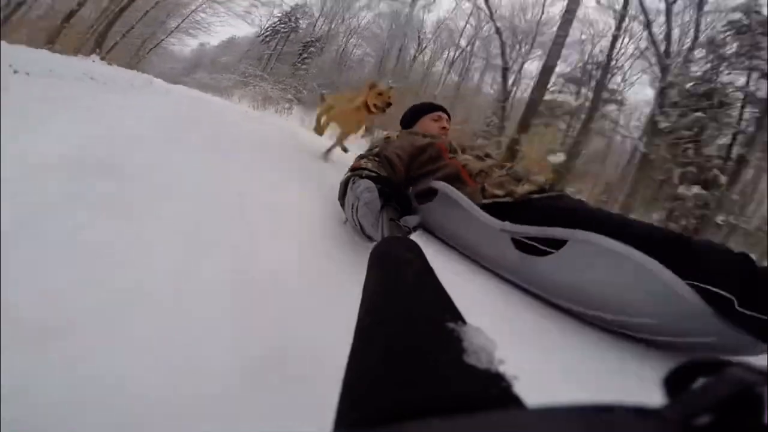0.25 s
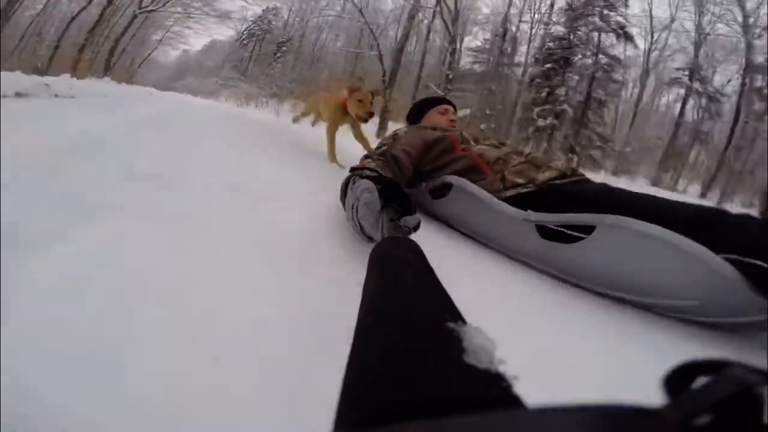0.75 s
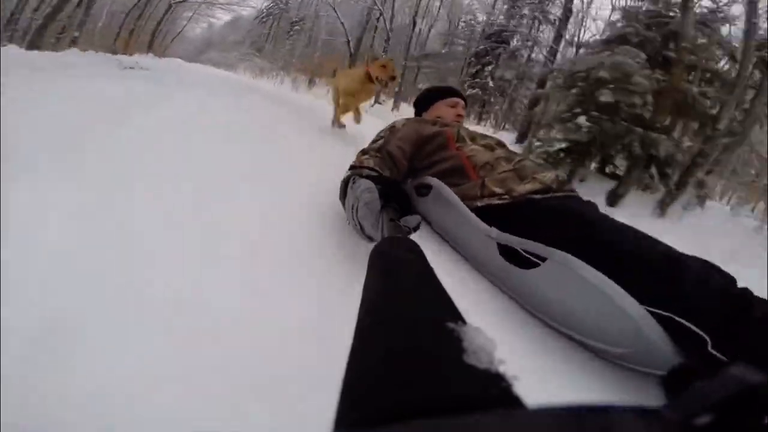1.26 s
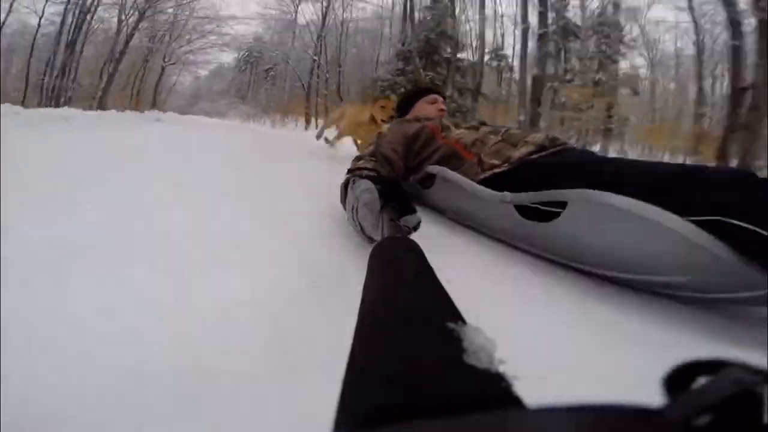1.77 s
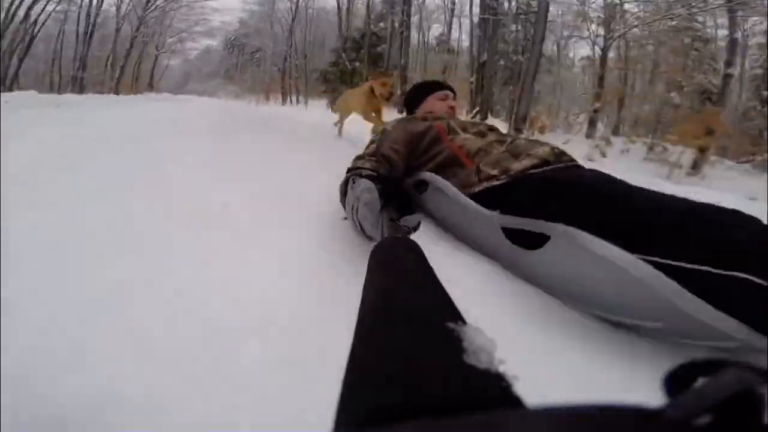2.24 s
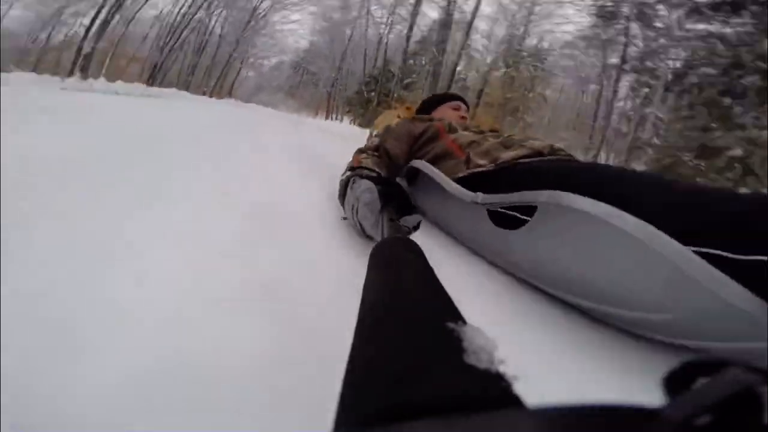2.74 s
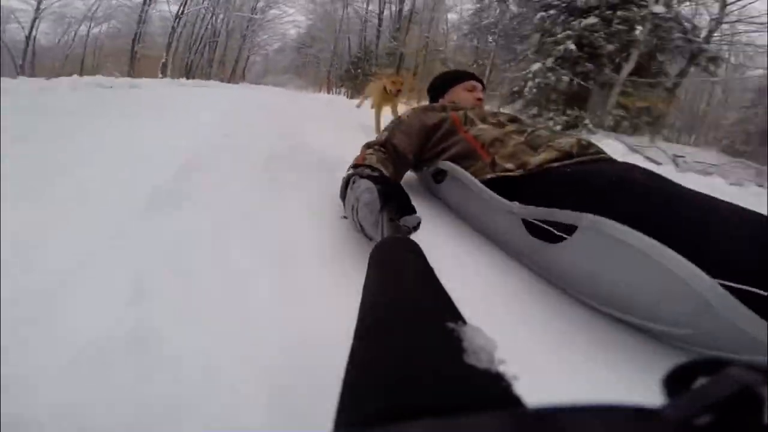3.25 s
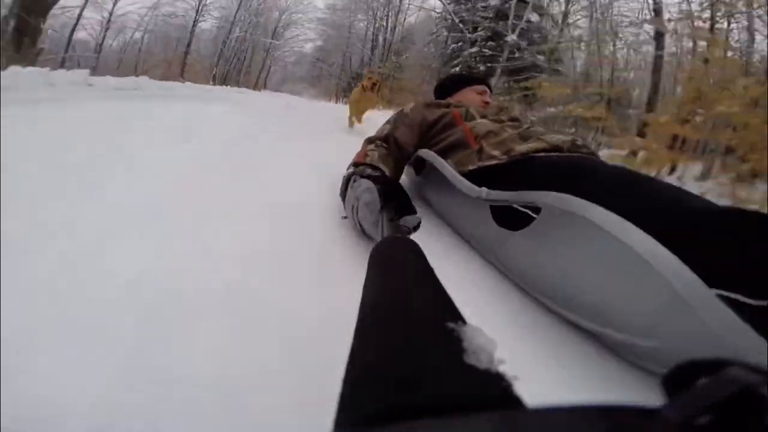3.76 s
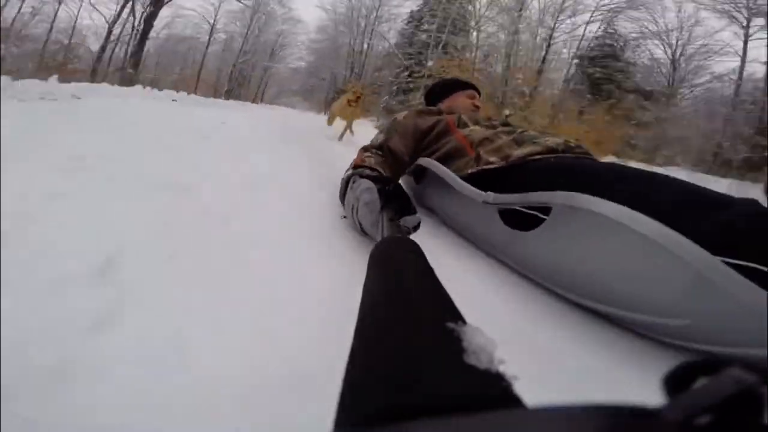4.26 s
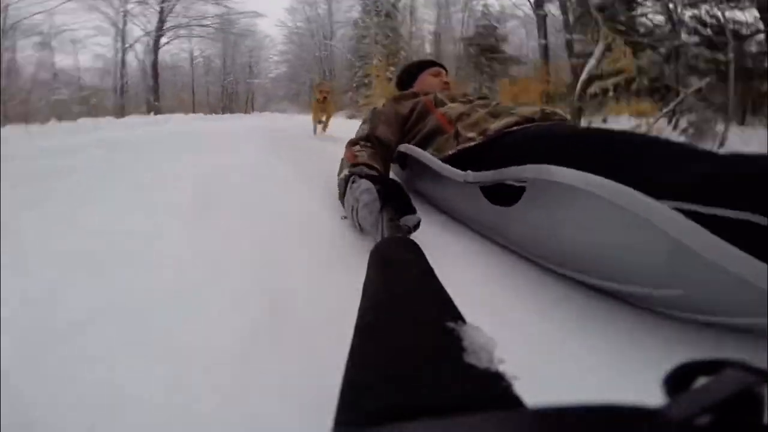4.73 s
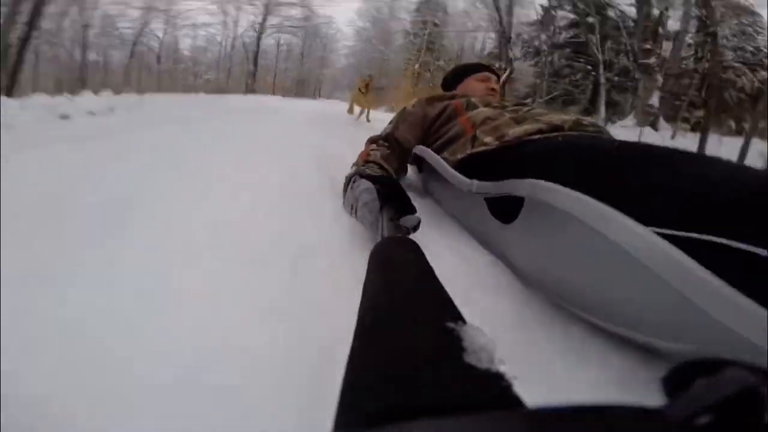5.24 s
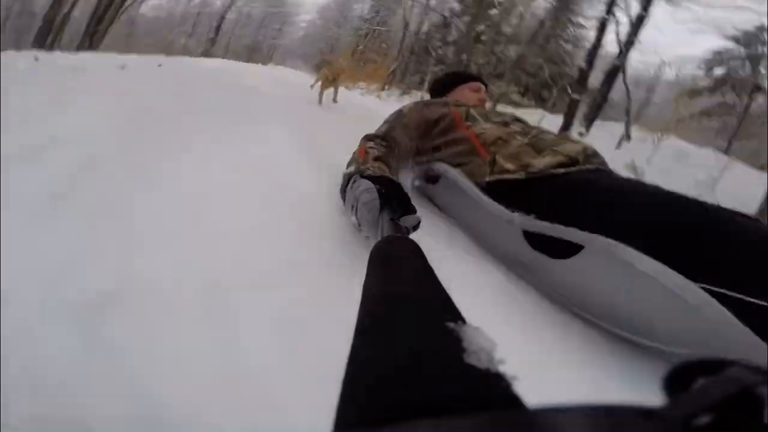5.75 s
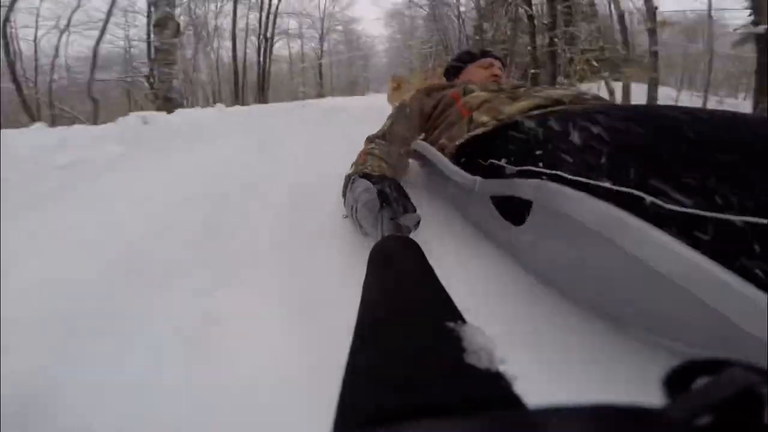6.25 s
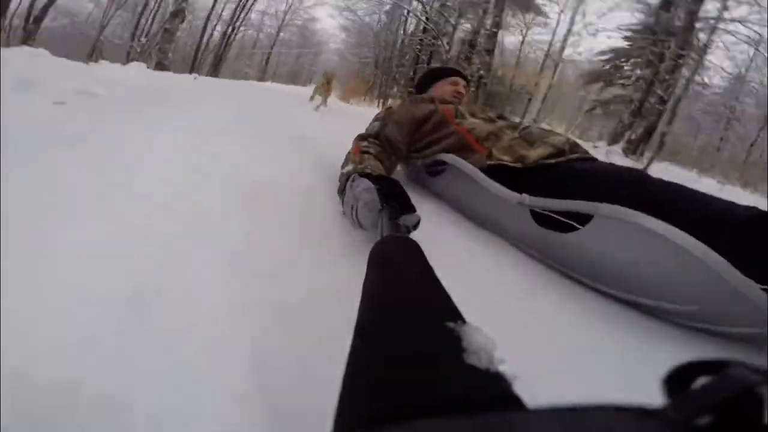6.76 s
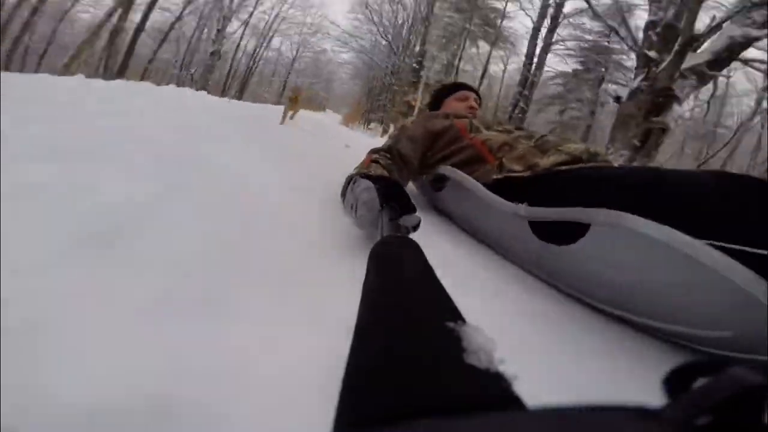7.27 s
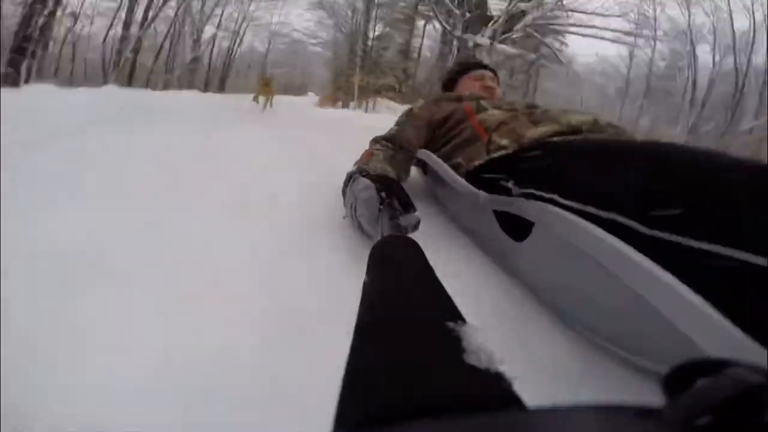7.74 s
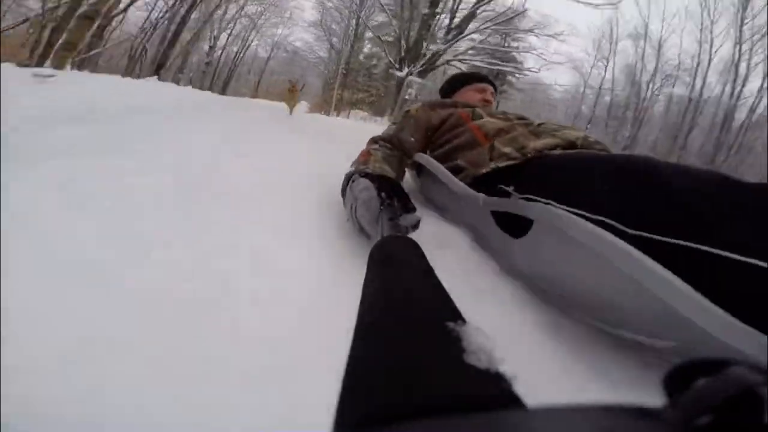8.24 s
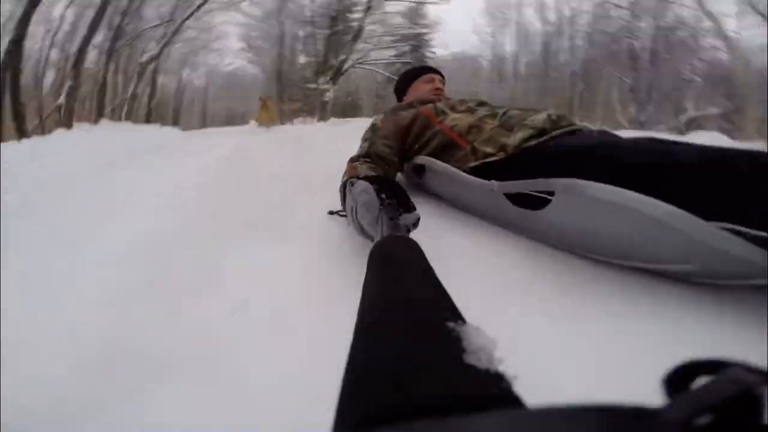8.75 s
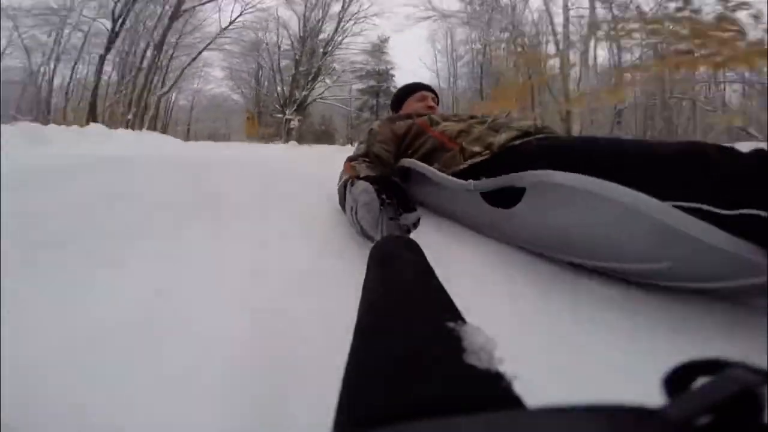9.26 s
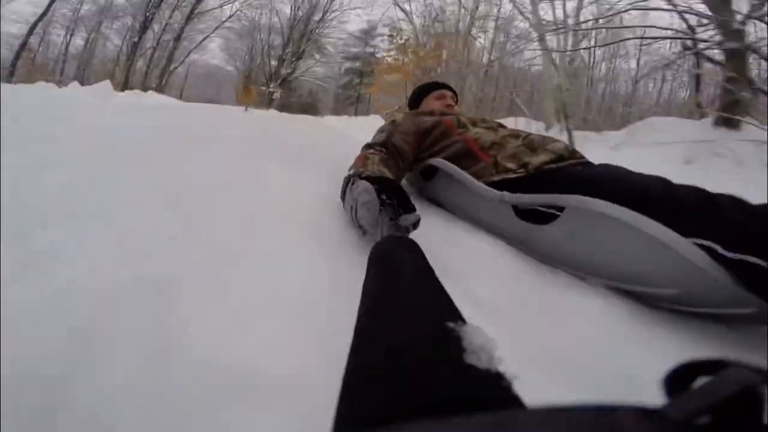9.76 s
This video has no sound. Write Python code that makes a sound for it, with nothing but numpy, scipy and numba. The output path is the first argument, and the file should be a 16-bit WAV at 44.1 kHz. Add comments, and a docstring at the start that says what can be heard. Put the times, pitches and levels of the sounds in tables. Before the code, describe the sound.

A plastic sled scrapes and hisses over packed snow, with low thuds and sharp ticks of ice hitting the microphone's case.

```python
"""First comes the gritty scrape of a plastic sled running down a packed snow road, with hissing spray and a
drumming hull. The microphone rides inside a hard camera case, on a pole that skims the snow. Right at the
microphone, loose ticks ring the case, a few loud ones and many faint ones; each touch on the snow shakes the
pole's bending modes into a low thud. The camera's limiter ducks for a moment after the loudest ticks."""
import sys
import numpy as np
from scipy.fft import rfft, irfft, next_fast_len
from scipy.io import wavfile
from scipy.ndimage import uniform_filter1d, map_coordinates
from numba import njit

SR = 44100
rng = np.random.default_rng(int(sys.argv[2]) if len(sys.argv) > 2 else 0)


def bounce(signal):
    """Save signal as a 16-bit WAV file at the path given by the first command-line argument."""
    frames = np.transpose(np.atleast_2d(signal))
    limited = np.clip(frames, -1, 1)
    pcm = np.round(limited * 32767).astype(np.int16)
    wavfile.write(sys.argv[1], SR, pcm)


N = 441000


def amp(db):
    """Gain of a level in dB."""
    return 10 ** (np.asarray(db) / 20)

def unit(x):
    """x at rms 1."""
    return x / np.sqrt(np.mean(x ** 2) + 1e-20)

def evened(x, seconds, depth):
    """x at rms 1 with its random swells partly evened out."""
    power = np.abs(uniform_filter1d(x ** 2, size=int(seconds * SR))) + 1e-12
    return unit(x / power ** (depth / 2))

def curves(rows):
    """One value per sample for each column after the time."""
    times, *columns = np.transpose(rows)
    return [np.interp(np.arange(N) / SR, times, column) for column in columns]

def wobble(rate):
    """A smooth random curve, rate knots a second."""
    return map_coordinates(rng.standard_normal(int(N * rate / SR) + 4), [np.arange(N) * rate / SR])

def filtered(x, response):
    """x through a complex response of frequency."""
    n = x.shape[-1]
    padded = next_fast_len(n + 8192)
    return irfft(rfft(x, padded) * response(np.fft.rfftfreq(padded, 1 / SR)), padded)[..., :n]

def modes(table):
    """Causal response of resonances with alternating signs."""
    return lambda f: sum((-1) ** k * amp(db) * 1j * f * width / (hz * hz - f * f + 1j * f * width)
                         for k, (hz, width, db) in enumerate(table))

def lowpass(corner_hz, power):
    """Causal low-pass response, 6 dB an octave for each unit of power."""
    return lambda f: 1 / (1 + 1j * f / corner_hz) ** power

def highpass(corner_hz, power):
    """The matching high-pass response."""
    return lambda f: (1 - lowpass(corner_hz, 1)(f)) ** power

def grit(per_second, spread_db, share):
    """Noise of rms 1 with a share of single snow grains of scattered size."""
    hit = rng.random(N) < per_second / SR
    size = amp(spread_db * np.minimum(rng.exponential(size=N), 3))
    grains = hit * size * rng.choice([-1, 1], N)
    return np.sqrt(share) * unit(grains) + np.sqrt(1 - share) * rng.standard_normal(N)


# Resonances around the microphone: f/Hz, width/Hz, level/dB
CASE_AIR = [(2340, 1200, -4)]
CASE_MODES = [(1403, 504, -2), (2279, 282, 4)]
LID_MODES = [(2570, 220, 4), (3478, 330, -4)]
def scrape(case_db, lid_db, patch, jolt_db):
    """Snow crushed under the hull rings the case and its lid, which the grip damps more or less."""
    pressure = amp(patch + 1.68 * wobble(45) + 0.42 * jolt_db)
    crunch = pressure * grit(per_second=500, spread_db=6.3, share=0.29)
    inside = filtered(crunch, lambda f: 0.88 + modes(CASE_AIR)(f))
    case = amp(case_db + 4.5) * unit(filtered(inside, modes(CASE_MODES)))
    lid = amp(lid_db + 3) * unit(filtered(inside, modes(LID_MODES)))
    return case + lid

# The case's thin walls, right beside the microphone: f/Hz, width/Hz, level/dB
WALL_MODES = [(4150, 600, -9), (4850, 650, 0), (5880, 700, -5), (6900, 800, -9.5), (8550, 700, -16),
              (9680, 1100, -12.5), (11800, 1300, -17.5), (13000, 1000, -23), (14600, 1500, -28)]
def spray(level_db, patch, jolt_db):
    """Snow spray hisses in the case walls; each rings through two stages and flickers on its own."""
    grains = grit(per_second=450, spread_db=8.5, share=0.14)
    wall = lambda hz, width: filtered(grains, lambda f: np.abs(modes([(hz, width, 0)])(f)) ** 2)
    walls = sum(amp(db + 2.4 * wobble(12)) * wall(hz, width) for hz, width, db in WALL_MODES)
    surge = amp(0.63 * patch + 0.9 * wobble(60) + 0.29 * jolt_db)
    return amp(level_db) * unit(surge * walls)

# The plastic hull, down on the road: f/Hz, width/Hz, level/dB
HULL_MODES = [(360, 300, 1.5), (577.5, 88, 7), (693, 82, 6.5), (1080, 3600, -40)]
def hull_drum(scrape_db, upper_db, jolt_db):
    """The hull drums along with the scrape and with the pole's upper bending."""
    bumps = amp(0.81 * wobble(25) + 0.28 * jolt_db) * rng.standard_normal(N)
    drive = np.hypot(amp(scrape_db - 8.5), amp(upper_db - 17.5))
    ringing = filtered(bumps, modes(HULL_MODES))
    return drive * unit(filtered(ringing, lowpass(1050, 2.22)))

# The run, heard from inside the case: t/s, scrape level/dB, spray level/dB, scrape level in the lid/dB
SLED_RUN = [(0.0, -35.5, -41, -32.5), (0.25, -37.5, -43, -39.5), (0.8, -39.5, -45, -41),
            (1.45, -40, -40, -38), (1.92, -39.5, -47, -42.5), (2.17, -45, -52, -46.5),
            (2.39, -42, -43.5, -41), (2.67, -40, -51.5, -43.5), (3.23, -42.5, -46.5, -42.5),
            (3.4, -35.5, -39.5, -38.5), (3.54, -37.5, -43.5, -40), (4.4, -36.5, -46, -41),
            (4.93, -44.5, -59, -51.5), (5.24, -43.5, -55, -49), (5.65, -37, -48.5, -35.5),
            (5.85, -48.5, -53.5, -57), (6.02, -32.5, -43, -33.5), (6.21, -34, -46, -31.5),
            (6.57, -37.5, -44.5, -41), (6.99, -30.5, -42.5, -34.5), (7.21, -31, -45.5, -37),
            (7.69, -36.5, -44, -33.5), (7.88, -35.5, -47, -36), (8.08, -42.5, -55, -41.5),
            (8.63, -47, -47.5, -47), (9.22, -47, -52.5, -48.5), (9.52, -40.5, -48.5, -45),
            (10.0, -39, -47.5, -44)]
def sled(upper_db):
    """The snow changes from patch to patch; quick rises of the pole's upper bending jolt the hull."""
    scrape_db, spray_db, lid_db = curves(SLED_RUN)
    jolt_db = np.clip(upper_db - uniform_filter1d(upper_db, size=int(0.35 * SR)), -6, 14)
    patch = wobble(33)
    return (scrape(scrape_db, lid_db, patch, jolt_db) + spray(spray_db, patch, jolt_db)
            + hull_drum(scrape_db, upper_db, jolt_db))


# Loud ticks on the case, right at the microphone: t/s, ring level/dB, ring f/Hz, treble level/dB
LOUD_TICKS = [(0.0524, -6.5, 2290, -13), (0.1334, -9.5, 3630, -6), (0.2422, -17, 2550, -14),
              (0.2766, -7.5, 2250, -5.5), (0.3637, -17, 2490, -7.5), (0.3886, -12.5, 2200, -26.0),
              (0.5303, -26, 2410.0, -15), (0.563, -15.5, 2280, -19.0), (0.8368, -13.5, 3450, -9),
              (0.8551, -15.5, 3416, -15), (0.8812, -14.5, 3450, -16.0), (0.9563, -11, 3280, 0),
              (1.1022, -12.5, 2366, -9), (1.2586, -11, 2450.0, -17), (1.319, -4, 2270, -5),
              (1.4041, -13.0, 2450, -11), (1.4452, -18, 2560, -11), (1.4495, -22, 2330, -22),
              (1.4899, -13, 2627, -10), (1.551, -10, 2280, 1), (1.5772, -4, 2650, -2),
              (1.5879, -19.0, 2470, -12), (1.6231, -4, 1818, -1), (1.6517, -19, 3430, -14),
              (1.9334, -9, 2166, -11.5), (1.9827, -7, 2540, -2.5), (2.1766, -12.5, 1745, -8.5),
              (2.194, -28, 2430.0, -7.5), (2.2242, -13, 3470.0, -8), (2.2491, -13.5, 2300, -23),
              (2.3048, -20.5, 2400, -10), (2.4315, -16, 2530, -9), (2.4454, -28, 2510, -17),
              (2.5173, -20.5, 2610.0, -15), (2.5542, -19.0, 1770.0, -16.0), (2.5831, 1, 2370, -0.5),
              (2.8717, -13.5, 2260, -20.5), (2.95, -20, 2480.0, -6.5), (3.0284, -8.0, 2240, -16.5),
              (3.1015, -19.0, 3420.0, -21), (3.1104, -16, 1740.0, -14), (3.2102, -24, 2544, -8.5),
              (3.4624, -11, 2286, -9.5), (3.5731, -11.5, 2440, -3), (3.6806, -6, 1730, -3.5),
              (3.8236, -16, 2130, -23), (3.829, -14.5, 2150, -14.5), (3.8637, -14, 2396, -12),
              (3.9313, -13, 1640, -7.5), (4.1304, -12, 2260.0, -19.0), (4.1418, -20, 2610.0, -12.5),
              (4.2122, -6, 2620, -7), (4.4773, -14, 1830, -18), (4.4938, -14.0, 2620, -14.0),
              (4.5315, -9, 1740, -6), (4.7382, -1, 2280, -12), (4.7567, -12.5, 1900, -33),
              (4.8739, -6, 1690, -6.5), (5.7519, -18.0, 3410, -13), (5.784, -12, 496, -37),
              (5.8405, -14, 2390, -7), (5.8542, -18, 1790, -17), (6.0707, -5.0, 2420, -45),
              (6.0729, -5.5, 2220, -23.0), (6.1495, -20, 2536, -18), (6.2313, -14, 2220, -5.5),
              (6.4349, -12, 2290, -13.0), (6.5466, -8.5, 1740, -5), (7.0747, -12, 1680, -3.5),
              (7.3892, -5, 2690, -7.5), (7.3967, 0.5, 2320, -25), (7.427, -9.5, 2197, -14.5),
              (7.462, -16, 2480.0, -22), (7.5137, -27, 2608, -19), (7.5468, -14.5, 2240, -19),
              (7.5768, -13.5, 2586, -14.0), (7.7621, -9, 2460, -7.5), (7.7983, -3, 3450, 2.5),
              (7.8412, -16, 3210.0, -10), (7.8494, -7.5, 2180, -9), (7.8579, 3, 2630.0, -35),
              (7.9133, -11.0, 2300.0, -11), (8.3593, -18, 2240.0, -21.0), (8.3715, -15.0, 2482, -27.0),
              (8.6172, -15.5, 2490, -7.5), (8.922, -6, 1682, 1), (9.0198, -26, 2500.0, -15),
              (9.2804, -5.5, 2244, -0.5), (9.4378, -14, 2280, -18.5), (9.4725, -27, 2370.0, -12.5),
              (9.565, -24, 1676, -17), (9.6413, -18.0, 2456, -10.0), (9.6608, -8.5, 2500, -4.5)]
def case_ticks(rows=LOUD_TICKS):
    """A brief rattle rings one spot of the case, its shared modes and the walls nearest the contact."""
    start, ring_db, ring_hz, treble_db = np.transpose(rows)[:, :, None]
    wall_hz = 5760 * np.exp(0.26 * rng.standard_normal(start.shape))  # each tick's brightest wall
    t = np.arange(SR // 20) / SR
    unit_peak = lambda x: x / np.abs(x).max(axis=1, keepdims=True)
    rise = lambda seconds: 1 - np.exp(-t / seconds)
    fall = lambda t60: amp(-60 * t / t60) + amp(-26 - 60 * t / 0.037)  # quick drop, faint tail
    rattle = rng.standard_normal((len(start), 2, len(t))) * rise(0.00045)
    spot = np.sin(2 * np.pi * ring_hz * t) * rise(0.000098) * fall(0.018)
    body = unit_peak(filtered(rattle[:, 0] * fall(0.0025), modes(CASE_MODES + LID_MODES)))
    walls = lambda f: (0.7 + modes([(wall_hz, 2500, 0)])(f)) * highpass(3500, 3)(f) * lowpass(8000, 3)(f)
    treble = unit_peak(filtered(rattle[:, 1] * fall(0.0077), walls))
    ticks = amp(ring_db + 1.02) * unit_peak(spot + 1.02 * body) + amp(treble_db - 2.36) * treble
    ticks = filtered(ticks, highpass(0.3 * ring_hz, 2))
    samples = np.round(start * SR).astype(int) + np.arange(len(t))
    return np.bincount(samples.ravel(), ticks.ravel(), N + len(t))[:N]

# Spots of the case that the faint ticks ring: f/Hz
FAINT_TICK_SPOTS = [1790, 2260, 2555, 3260]
# How thickly the faint ticks arrive: t/s, rate/(ticks per s)
FAINT_TICK_RATE = [(0, 22), (2.6, 24.7), (4.5, 11.2), (5.4, 14), (6.3, 16.3), (6.55, 2.93), (7.3, 3.2),
                   (7.38, 42), (7.95, 30), (8.1, 8), (8.5, 19.3), (10, 13)]
def faint_ticks():
    """Further, fainter ticks of the same kind at random moments; their treble follows the spray."""
    expected = np.cumsum(curves(FAINT_TICK_RATE)[0]) / SR
    due = np.cumsum(rng.exponential(size=400))
    start = np.searchsorted(expected, due) / SR
    ring_scatter, treble_scatter, detune = rng.standard_normal((3, len(start)))
    ring_hz = rng.choice(FAINT_TICK_SPOTS, len(start)) * (1 + 0.06 * detune)
    ring_db = -28 + 3 * np.minimum(ring_scatter, 1.5)
    times, _, spray_db, _ = np.transpose(SLED_RUN)
    spray_swing_db = np.interp(start, times, spray_db) - spray_db.mean()
    treble_db = -23.5 + 0.54 * spray_swing_db + 3 * np.minimum(treble_scatter, 1.5)
    rows = np.transpose([start, ring_db, ring_hz, treble_db])
    return case_ticks(rows[due < expected[-1]])


# The pole touches the snow: t/s, hold/s, lowest bending level/dB, sway re that/dB, upper re that/dB
POLE_TOUCHES = [(0.179, 0.015, -8, -8, -15), (0.542, 0.17, -30.5, 1.5, 2.5), (0.657, 0.02, -8.5, -18, -18),
                (1.862, 0.051, -23, 2, -4), (1.946, 0.019, -11, -22, -9), (2.676, 0.021, -23, -11.0, -5),
                (2.76, 0.018, -23.5, -14, -7), (2.819, 0.024, -19, 1.5, -4.5), (2.89, 0.079, -18, -9, -6),
                (2.988, 0.034, -11.5, -15, -12), (3.467, 0.044, -14.5, -20, -10.5),
                (3.555, 0.028, -9, -15, -12.5), (3.751, 0.059, -21.5, -10.0, -7),
                (3.869, 0.03, -14.5, -22, -9.5), (3.926, 0.047, -13.5, -15, -10.5),
                (4.101, 0.035, -15.5, 1.5, -5.5), (4.23, 0.14, -16, -7, -6),
                (4.365, 0.065, -14.5, -17, -7.5), (4.58, 0.068, -12.5, -11, -2),
                (4.68, 0.086, -17, -8, -1.5), (4.83, 0.012, -22, 2, 2.5), (4.899, 0.017, -17.0, -7, -2.5),
                (4.956, 0.029, -14.5, -13, -10.5), (5.063, 0.014, -12.5, -18.0, -7.5),
                (5.206, 0.031, -13, -5, -2.0), (5.322, 0.052, -16.5, -3.0, -6.5),
                (5.479, 0.011, -14, -2.5, -9.5), (5.52, 0.12, -28, 10.5, -41),
                (5.657, 0.033, -17.5, 1, -7.5), (5.772, 0.033, -24.5, 8, -12), (5.877, 0.045, -26.5, 7, -9),
                (5.92, 0.2, -25, 5, -12.5), (6.141, 0.023, -15.5, -20, -10.5),
                (6.286, 0.016, -11.5, -28, -13), (6.39, 0.037, -26.5, -13, -6),
                (6.565, 0.043, -39, -11, 12.5), (6.662, 0.019, -28.5, -14, 5),
                (6.735, 0.14, -22.5, -12, 0.5), (6.899, 0.046, -21, -12, -2), (6.96, 0.3, -19.5, -20, -3.5),
                (7.209, 0.027, -14, -6.0, -3.0), (7.333, 0.042, -19.5, -15.5, -2.5),
                (7.47, 0.14, -33, 5, -11), (7.618, 0.024, -14, 0.5, -18), (7.7, 0.038, -18.5, -6, -8),
                (7.932, 0.028, -20.5, -8, -9.5), (8.04, 0.026, -15.5, -15, -5.5),
                (8.29, 0.046, -16, -1.5, -10.5), (8.511, 0.036, -13.5, -2.0, -20),
                (8.731, 0.036, -24.5, 5, -26), (9.281, 0.24, -18.5, -2, -10), (9.489, 0.027, -11, -12, -11),
                (9.622, 0.023, -10.5, -14, -10.5), (9.699, 0.044, -13.5, -12, -11.5),
                (9.768, 0.042, -9.5, -19, -13.5), (9.85, 0.063, -14, -1, -6.5), (9.91, 0.08, -10.5, -3, -7)]
# Its tremble between touches: t/s, level/dB
POLE_TREMBLE = [(0, -40.5), (1.45, -38), (2.1, -45.5), (3.2, -38.5), (5.5, -28), (7.3, -25), (8.1, -40),
                (9.05, -51), (10, -23)]
def pole_levels():
    """Lowest bending, sway and upper bending in dB: touches rise, hold and ring out over the tremble."""
    rise_s, fall_db_per_s = 0.013, 380  # for the lowest bending
    sway_pace, upper_pace, upper_lead_s = 0.72, 1.07, 0.0065  # the upper bending answers first
    t = np.arange(0, N / SR + 0.004, 0.002)
    start, hold, bend_db, sway_offset, upper_offset = np.transpose(POLE_TOUCHES)[:, :, None]
    rise_db = lambda lead: 6 * (np.maximum(start - lead - t, 0) / rise_s) ** 2
    fall_db = lambda lead: fall_db_per_s * np.maximum(t - start - hold + lead, 0)
    bend = bend_db - rise_db(0) - fall_db(0)
    sway = bend_db + sway_offset - rise_db(0) - sway_pace * fall_db(0)
    upper = bend_db + upper_offset - upper_pace * (rise_db(upper_lead_s) + fall_db(upper_lead_s))
    flicker_db = 1.36 * wobble(26)[np.minimum((t * SR).astype(int), N - 1)]
    tremble_db = np.interp(t, *np.transpose(POLE_TREMBLE)) + flicker_db
    levels = [10 * np.log10(amp(touch_db).max(0) ** 2 + amp(tremble_db + offset_db) ** 2)
              for touch_db, offset_db in [(bend, 0), (sway, -1), (upper, -8.5)]]
    return curves(np.transpose([t, *levels]))

# Bending modes of the pole that carries the microphone: f/Hz, width/Hz, level/dB
LOWEST_BENDING = [(111, 13.1, 12.5), (77.4, 37, -5)]
UPPER_BENDING = [(194.6, 28, 1), (238.6, 27, -3), (282, 44, -5)]
# Spectrum of its slow sway: f/Hz, density level/dB
SWAY_SPECTRUM = [(12, -19), (28, -6), (45, 2.5), (65, -13.5), (110, -9), (200, -118)]
def pole(bend_db, sway_db, upper_db):
    """Bumpy contact keeps the pole shaking; the grip damps everything far from its modes."""
    bumps = rng.standard_normal(N)
    bend = filtered(filtered(bumps, modes(LOWEST_BENDING)), lowpass(106.4, 3.53))
    upper = filtered(bumps, lambda f: modes(UPPER_BENDING)(f) * modes([(235, 140, 0)])(f) ** 2)
    hz, density_db = np.transpose(SWAY_SPECTRUM)
    sway = filtered(bumps, lambda f: amp(np.interp(np.log(f + 1), np.log(hz + 1), density_db)))
    return (amp(bend_db) * evened(unit(bend), seconds=0.0347, depth=0.6)
            + amp(sway_db) * evened(unit(sway), seconds=0.064, depth=0.19)
            + amp(upper_db) * evened(unit(upper), seconds=0.093, depth=0.047))


def scene():
    """Everything reaches one microphone through the case."""
    bend_db, sway_db, upper_db = pole_levels()
    return (pole(bend_db, sway_db, upper_db) + sled(upper_db) + case_ticks() + faint_ticks())[None]

@njit
def peak_follower(level, fall):
    """Follows a level up at once and down slowly."""
    out = level.copy()
    for i in range(1, len(out)):
        out[i] = max(out[i], out[i - 1] * fall)
    return out

def record(dry):
    """The camera's limiter ducks a little late and recovers slowly; soft clipping, then a band limit."""
    threshold_db, release_s, lag_samples = -2.5, 0.06, 60
    shelf_hz, cutoff_hz = 15150, 16450
    peaks = peak_follower(np.abs(dry[0]), np.exp(-1 / (release_s * SR)))
    overshoot = np.maximum(peaks / amp(threshold_db), 1)
    late_gain = np.pad(overshoot ** -0.7, (lag_samples, 0), "edge")[:N]
    limited = dry * uniform_filter1d(late_gain, size=61)
    clipped = limited / (1 + np.abs(limited / 0.98) ** 6) ** (1 / 6)
    return filtered(clipped, lambda f: (f < cutoff_hz) * np.where(f < shelf_hz, 1, amp(-29)))


dry = scene()
out = record(dry)
bounce(out)
```